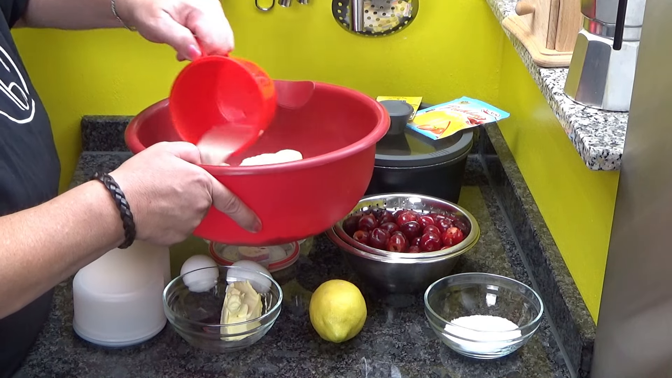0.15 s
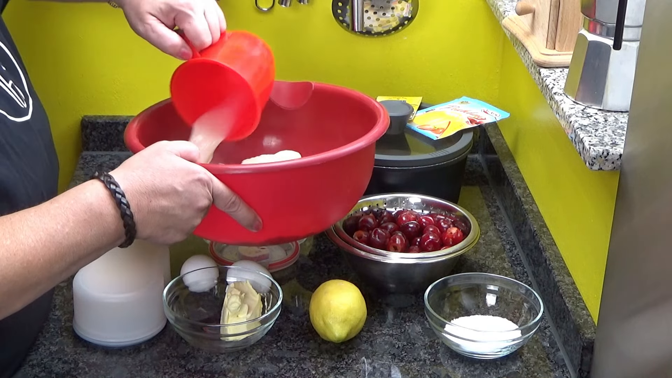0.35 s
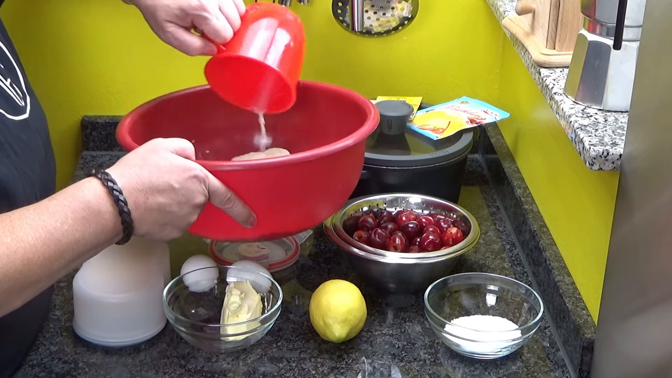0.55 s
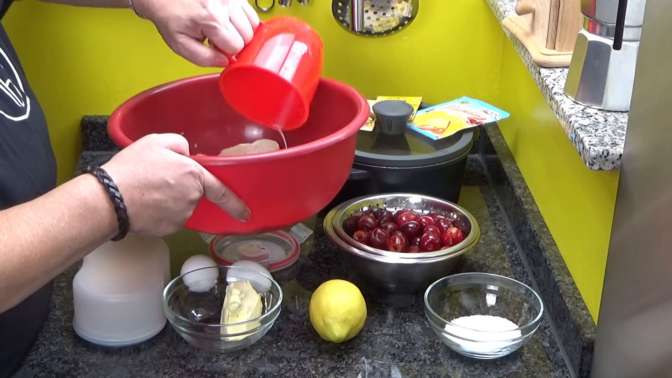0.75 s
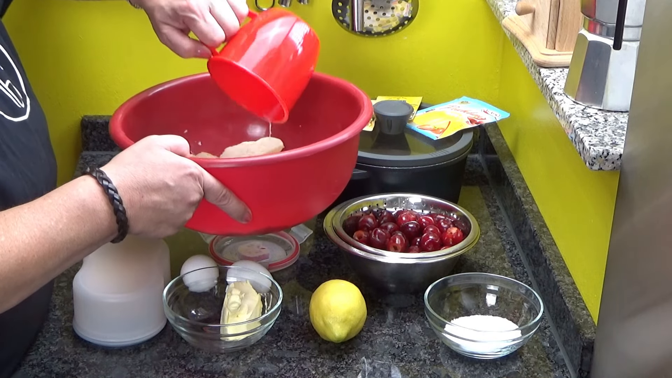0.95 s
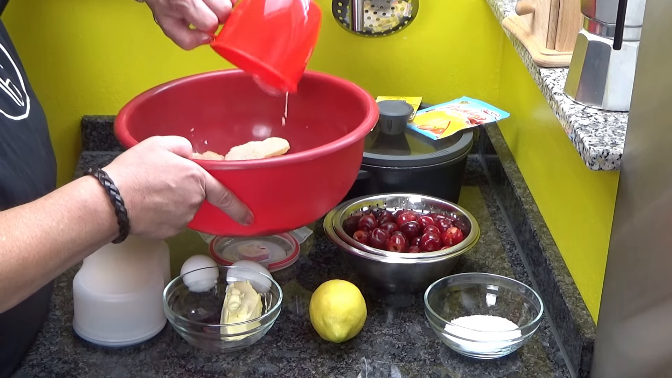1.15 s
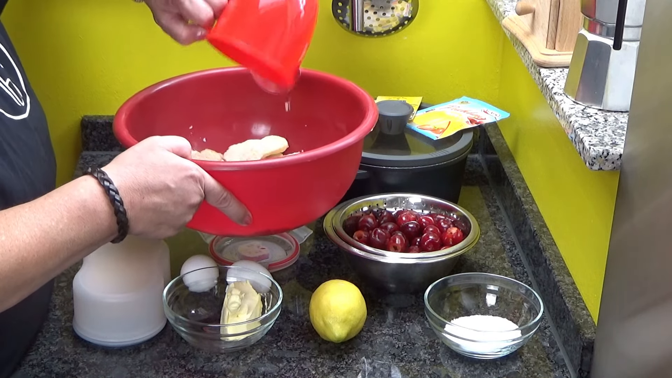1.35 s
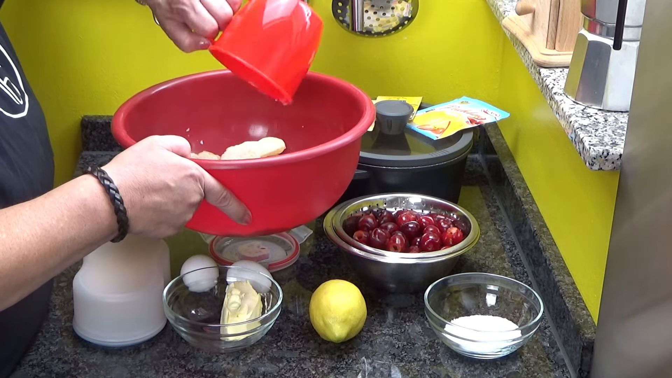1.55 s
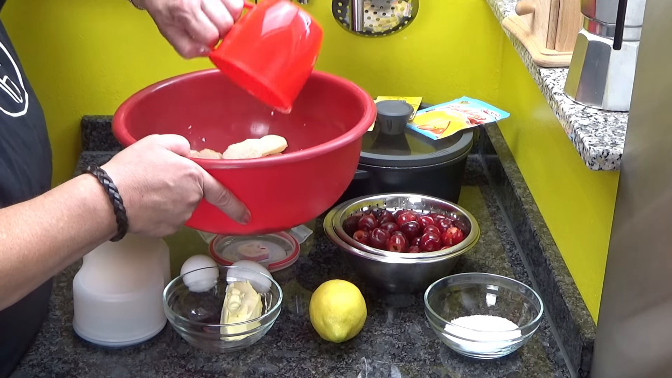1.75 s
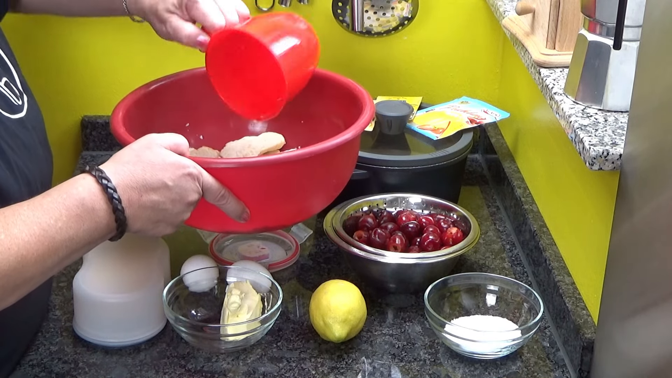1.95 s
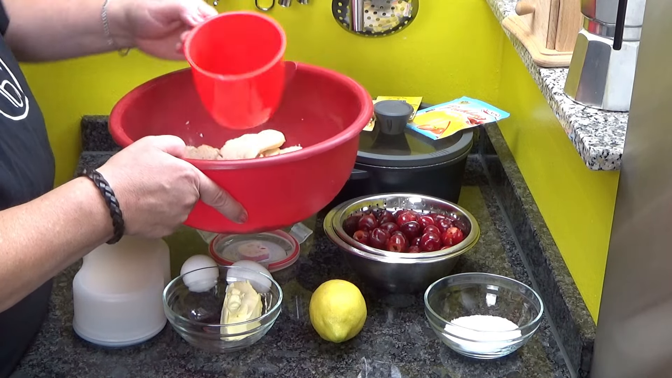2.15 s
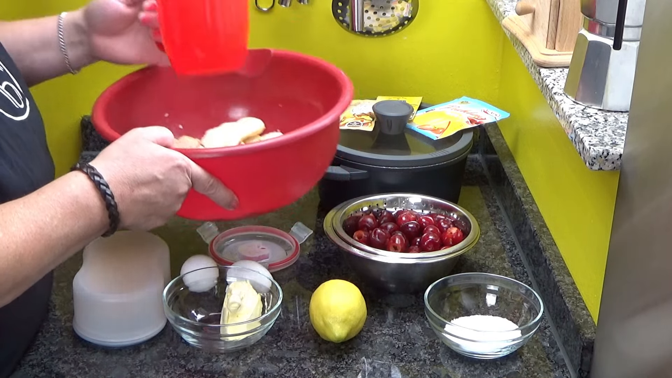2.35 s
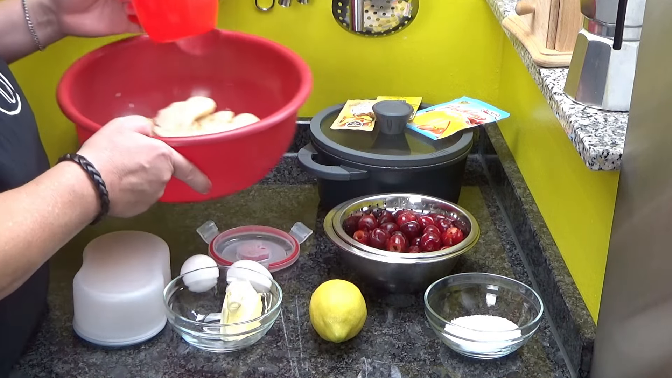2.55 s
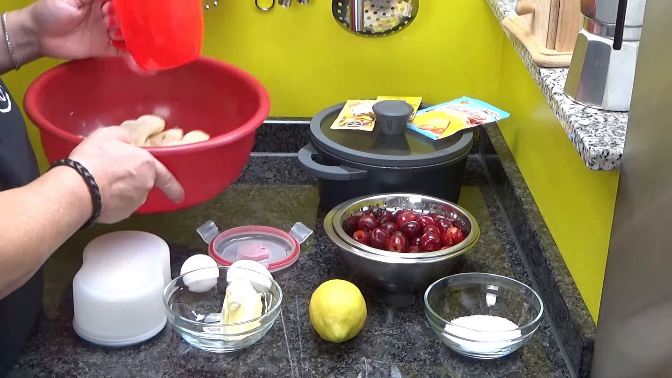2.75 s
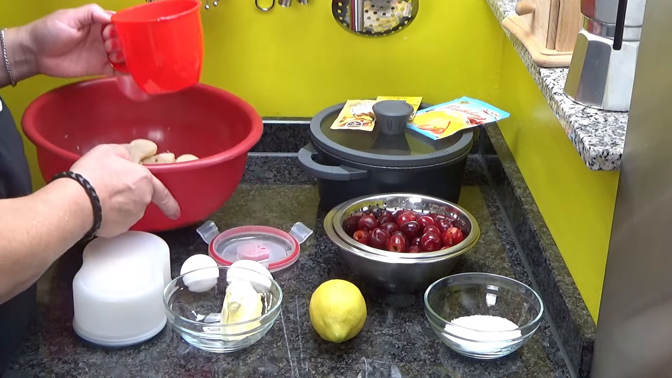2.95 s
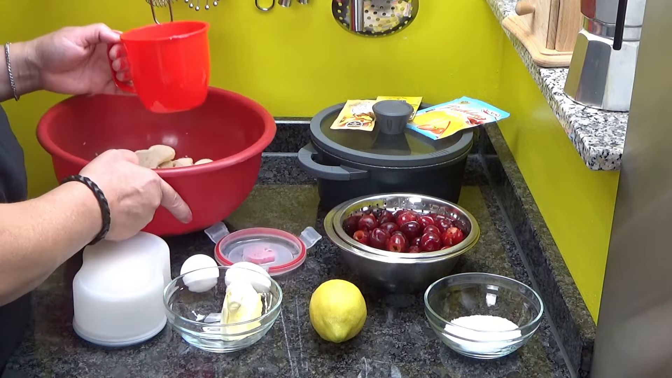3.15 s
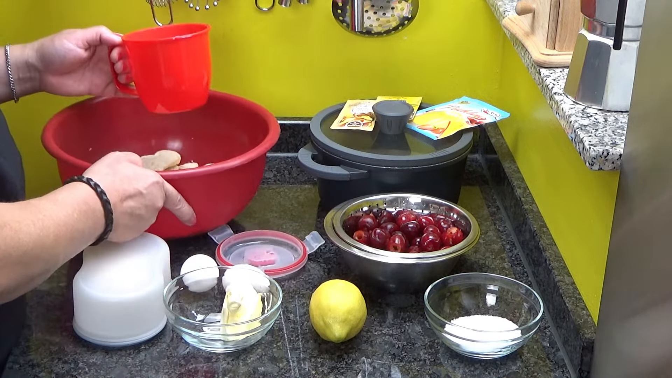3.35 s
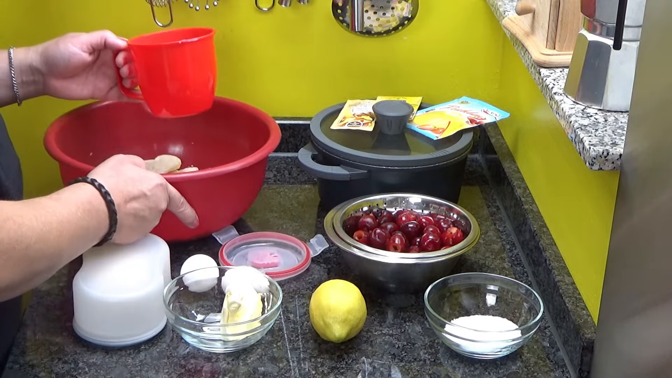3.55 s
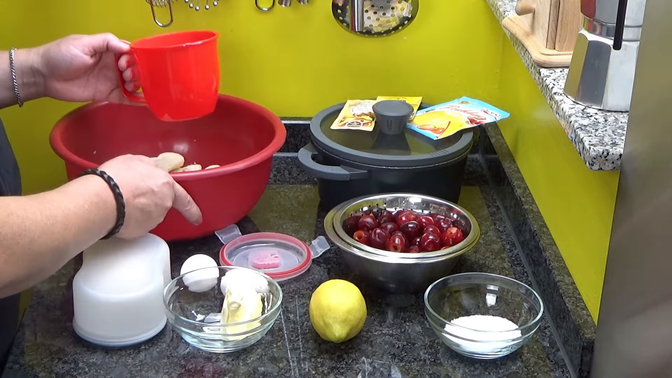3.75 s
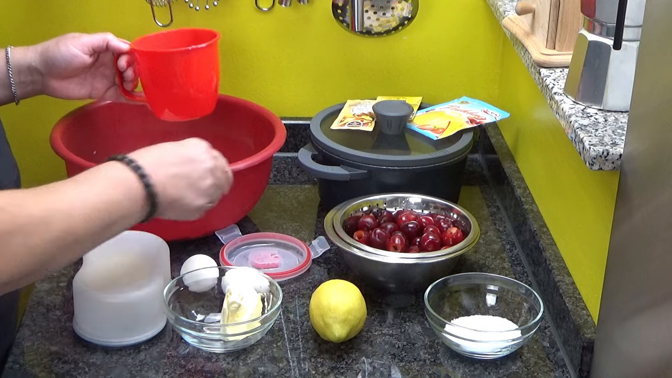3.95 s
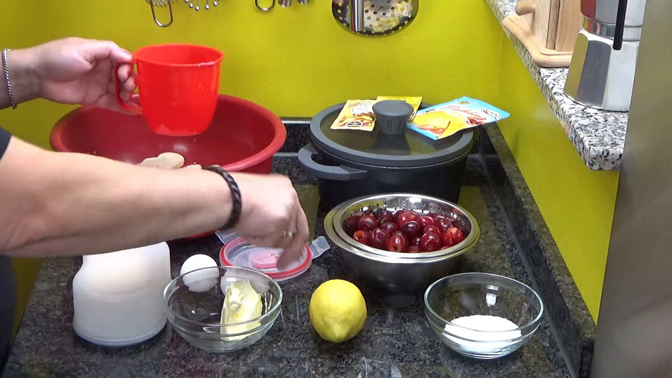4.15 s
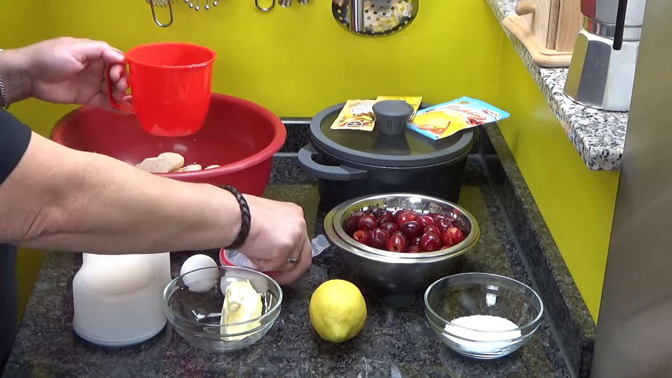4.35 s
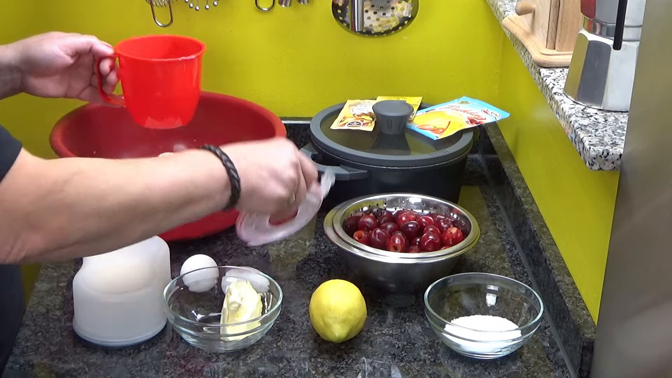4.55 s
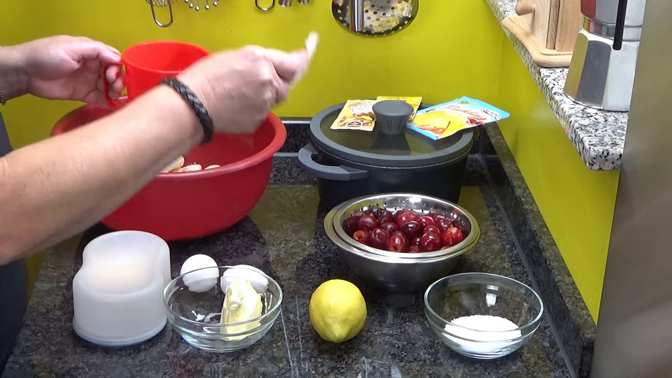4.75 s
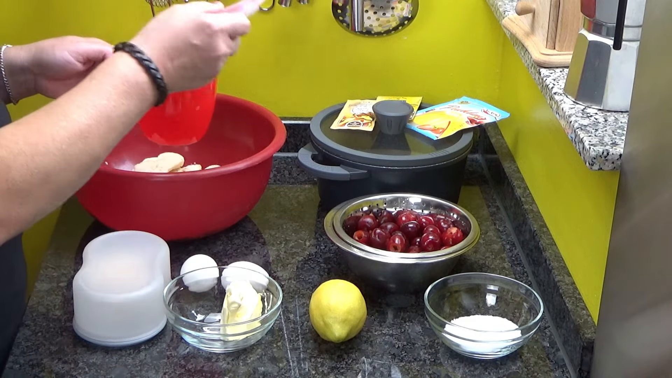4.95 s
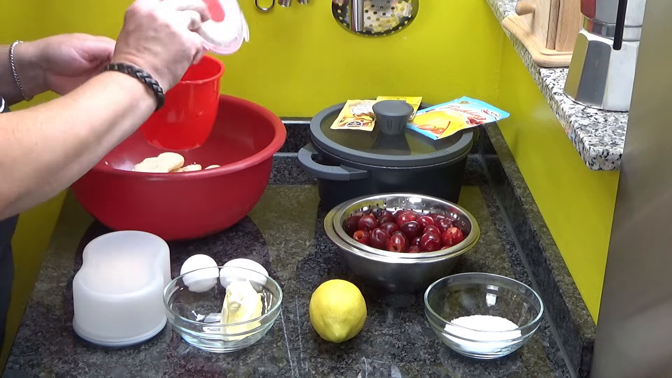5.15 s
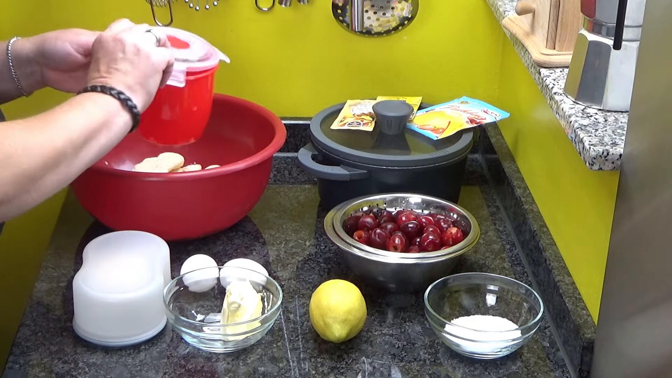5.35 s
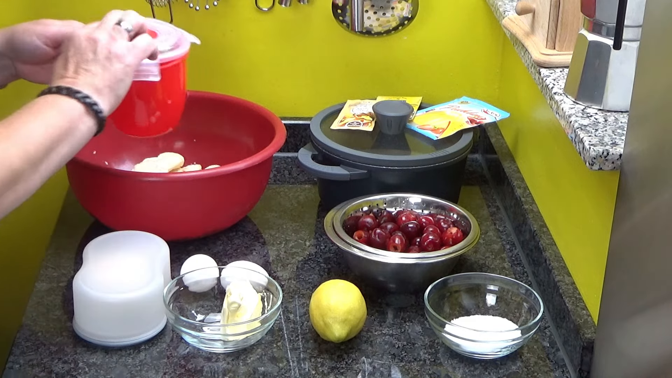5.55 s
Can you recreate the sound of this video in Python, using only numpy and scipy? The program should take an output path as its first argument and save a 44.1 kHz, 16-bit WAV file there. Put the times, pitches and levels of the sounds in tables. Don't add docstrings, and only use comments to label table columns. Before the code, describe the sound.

Liquid briefly fizzes and plips into a plastic bowl, then only hiss and faint regular ticking remain. Around three seconds the bowl touches the worktop, knocks loudly with a hollow ring, scrapes and taps; a faint camera whine begins. Soft hand touches follow, then a bright plastic snap and a quick double clack of a lid on a jug, with short tiled-room echo.

```python
import sys
import numpy as np
from scipy import signal
from scipy.fft import rfft, irfft, next_fast_len
from scipy.io import wavfile
from scipy.ndimage import uniform_filter1d

SR = 44100
rng = np.random.default_rng(int(sys.argv[2]) if len(sys.argv) > 2 else 0)


def field_ratio(decibels):
    return 10 ** (np.asarray(decibels, dtype=float) / 20)


def wav_out(sig):
    wavfile.write(sys.argv[1], SR, np.round(np.clip(np.atleast_2d(sig).T, -1, 1) * 32767).astype(np.int16))


N = 247489


def unit(x):
    return x / np.sqrt(np.mean(x ** 2) + 1e-20)


def along(points, hz):
    f, v = np.transpose(points)
    return np.interp(np.log(hz + 1), np.log(f + 1), v)


def colour(x, points, tilt_db=0):
    m = next_fast_len(x.shape[-1] + 4096) // 2 * 2
    hz = np.fft.rfftfreq(m, 1 / SR)
    gain_db = along(points, hz) + tilt_db * np.log2((hz + 50) / 1000)
    cepstrum = irfft(np.log(field_ratio(gain_db) + 1e-6), m)
    cepstrum[..., 1:m // 2] *= 2
    cepstrum[m // 2 + 1:] = 0
    return irfft(rfft(x, m) * np.exp(rfft(cepstrum)), m)[..., :x.shape[-1]]


def add(track, s, x):
    part = track[..., round(s * SR):round(s * SR) + x.shape[-1]]
    part += x[..., :part.shape[-1]]


# frequency in Hz, level in dB per Hz.
HISS_COLOUR = [(20, -7), (35, -1), (55, 1.5), (130, 2.5), (250, 1), (400, -1.6), (700, -2.6), (1200, -5.1),
               (2000, -8.3), (3200, -9.5), (5000, -12.2), (8000, -14.1), (12000, -17.4), (15900, -19.5)]
# frequency in Hz, level in dB per Hz.
HISS_SIDE_COLOUR = [(12, -45), (20, -31), (398, -3), (484, -6), (572, -3), (1150, -4.5), (1850, -7),
                    (7690, -21), (15900, -40)]
# frequency in Hz, width in Hz, level in dB.
HUM_RESONANCES = [(115, 19, -3.5), (191, 4.6, 1.5)]


def hiss_and_hum():
    hz = np.fft.rfftfreq(N, 1 / SR)
    resonance = sum(field_ratio(db) * hz * width / np.abs(centre * centre - hz * hz + 1j * hz * width)
                    for centre, width, db in HUM_RESONANCES)
    hum = unit(irfft(rfft(rng.standard_normal(N)) * resonance, N))
    hiss = unit(colour(rng.standard_normal(N), HISS_COLOUR))
    side = unit(colour(rng.standard_normal(N), HISS_SIDE_COLOUR))
    return np.array([field_ratio(-57.6) * hiss + field_ratio(-65.5) * hum, field_ratio(-65.5) * side])


def lens_motor():
    frame_s, hunt_s, spin_up_s = 0.04, 3.0, 0.05
    idle_click_db, hunt_click_db = -65, -72
    whine_db, ease_db, ease_s = -56.5, 1, 0.5
    since = np.arange(N) / SR - hunt_s
    hunting = 1 / (1 + np.exp(-since / spin_up_s))
    click_gain = field_ratio(idle_click_db + (hunt_click_db - idle_click_db) * hunting)
    whine_gain = hunting * field_ratio(whine_db + ease_db * np.exp(-abs(since) / ease_s))
    steps = np.zeros(N)
    steps[(np.arange(0.0195, N / SR, frame_s) * SR).astype(int)] = 1
    steps *= field_ratio(1.5 * rng.standard_normal(N))
    t = np.arange(600) / SR
    click = (np.sin(2 * np.pi * 2520 * t) + np.sin(2 * np.pi * 3520 * t)) * field_ratio(-60 * t / 0.03)
    whine = np.sin(2 * np.pi * 2730 * t) * np.exp(-((t - 0.0065) / 0.0042) ** 2)
    mid = signal.fftconvolve(steps * click_gain, click) + signal.fftconvolve(steps * whine_gain, whine)
    return mid[:N] * [[1], [-0.08]]


def bubbles(starts, hz, cycles, gain, rise):
    t = np.arange(700) / SR
    age = t * (hz / cycles)[:, None]
    phase = 2 * np.pi * hz[:, None] * t * (1 + rise * np.minimum(age, 1))
    wave = np.sin(phase) * np.exp(-3 * age) * (1 - np.exp(-t / 0.00022))
    where = (starts * SR).astype(int)[:, None] + np.arange(len(t))
    return np.bincount(where.ravel(), (gain[:, None] * wave).ravel(), N + SR)[:N]


# time in seconds, flow in dB.
STREAM_FLOW = [
    (0.021, -71),
    (0.294, -65.5),
    (0.436, -64.5),
    (0.57, -66),
    (0.68, -77),
]
# frequency in Hz, level in dB per Hz.
SPRAY_COLOUR = [(350, -25), (600, -11.5), (1560, -5), (2100, -10.5), (3360, -9), (5250, -10.5), (6960, -10),
                (9490, -11.5), (15000, -36)]
# start in seconds, peak in dB, bubble pitch in Hz, level in dB of the fine bubbles beside it.
BIG_DROPS = [(0.1224, -53, 3920, -70), (0.2547, -58, 2660, -47), (0.2892, -43, 3960, -65),
             (0.3089, -37, 4650, -64), (0.321, -43, 4860, -49), (0.3527, -38.5, 5500, -37.5),
             (0.3674, -48, 5010, -38), (0.4325, -27, 5260, -51), (0.441, -32, 5870, -58),
             (0.4486, -32, 5900, -45), (0.4552, -37, 2110, -65), (0.4907, -46, 6140, -52),
             (0.4965, -37.5, 11000, -46), (0.496, -41, 3960, -60), (0.5571, -45.5, 4200, -64)]


def pour():
    bubbles_per_s = 250
    times, flows = np.transpose(STREAM_FLOW)
    flow_db = np.interp(np.arange(N) / SR, times, flows, left=-120, right=-120)
    starts = np.arange(times[0], times[-1], 1 / bubbles_per_s)
    delay, pitch, life, size = rng.random((4, len(starts)))
    fizz = bubbles(starts + 0.012 * delay, 1500 * 7 ** pitch, 3 + 6 * life,
                   field_ratio(-4 * np.log(size + 1e-3)), rise=0.13)
    spray = unit(colour(rng.standard_normal(N), SPRAY_COLOUR))
    stream = field_ratio(flow_db) * (field_ratio(-3.5) * spray + field_ratio(-1) * fizz)

    sizes = []
    for start, peak_db, bubble_hz, fine_db in BIG_DROPS:
        sizes.append((start, peak_db, bubble_hz, 12.2))
        sizes.append((start, fine_db, 9200, 13.4))
    s, db, hz, cycles = np.repeat(np.transpose(sizes), repeats=6, axis=1)
    spread = rng.standard_normal((len(s), 2))
    late = abs(spread[:, 0]) * (np.arange(len(s)) % 6 > 0)
    drops = bubbles(s + 0.0037 * late, hz * np.exp(0.083 * spread[:, 1]), cycles,
                    field_ratio(db - 2.0 - 3.0 * late), rise=0.029)
    impacts = np.bincount((s * SR).astype(int), field_ratio(db), N)
    puffs = signal.fftconvolve(impacts, field_ratio(-60 * np.arange(3000) / SR / 0.041))[:N]
    return stream + drops + field_ratio(-35.5) * puffs * spray


# frequency in Hz, time to fall 60 dB in seconds.
KITCHEN_DECAY = [(150, 0.31), (600, 0.39), (2000, 0.47), (6000, 0.34), (14000, 0.32)]
# frequency in Hz, side against mid in dB.
ECHO_WIDTH = [(100, -45), (500, -19.5), (1500, -9.5), (4000, -12.5), (9000, -13), (14000, -27)]


def in_room(x, wet_db, sent=None):
    hz, t, z = signal.stft(rng.standard_normal((2, SR // 2)), SR, nperseg=256)
    tail = signal.istft(z * field_ratio(-60 * t / along(KITCHEN_DECAY, hz)[:, None]), SR, nperseg=256)[1]
    build_up = np.clip(np.arange(tail.shape[1]) / SR / 0.0074, 0, 1)
    tail *= build_up / np.linalg.norm(tail[0])
    tail[1] = colour(tail[1], ECHO_WIDTH)
    source = x if sent is None else sent
    wet = field_ratio(wet_db) * signal.fftconvolve(source[None], tail, axes=1)[:, :len(x)]
    return wet + [x, -0.04 * x]


# start in seconds, peak in dB, centre in Hz, spread in octaves, length in seconds.
SOFT_TOUCHES = [(2.202, -56, 4000, 1.2, 0.053), (2.904, -49.5, 505, 1.7, 0.069),
                (3.823, -48, 4900, 0.84, 0.012), (4.009, -46.5, 2400, 0.72, 0.03),
                (4.369, -47.5, 600, 2.2, 0.07), (4.417, -48.5, 4030, 1.3, 0.024),
                (4.423, -39, 404, 0.83, 0.045), (4.424, -40.5, 1750, 1.16, 0.035),
                (4.939, -54.5, 3300, 1, 0.067), (4.947, -54, 835, 0.71, 0.055),
                (5.007, -54, 835, 0.7, 0.092), (5.272, -48.5, 4000, 1.04, 0.019),
                (5.273, -50, 1420, .3, 0.023), (5.525, -43.5, 3000, 0.9, 0.018)]


def touches():
    track, t = np.zeros((2, N)), np.arange(SR // 3) / SR
    octaves = np.arange(-4, 5)
    for s, db, hz, spread, length in SOFT_TOUCHES:
        hump = np.transpose([hz * 2.0 ** (octaves * spread / 2), -3 * octaves ** 2])
        swell = 1 - np.exp(-t / (0.24 * length))
        puff = colour(rng.standard_normal(len(t)) * field_ratio(-60 * t / length) * swell, hump)
        add(track, s, in_room(field_ratio(db) * puff / abs(puff).max(), wet_db=-4))
    return track


def knocks(contacts, crack_colour, modes, ring_db, wet_db):
    track, t = np.zeros((2, N)), np.arange(SR // 2) / SR
    hz, level_db, t60 = np.transpose(modes)[:, :, None]
    for s, db, tilt_db, more_ring_db, length in contacts:
        crackle = rng.standard_normal(len(t)) * field_ratio(-60 * t / length) * (1 - np.exp(-t / 0.00058))
        crack = colour(crackle, crack_colour, tilt_db)
        crack /= abs(crack).max()
        average = colour(1.0 * (t == 0), crack_colour, tilt_db)
        average *= np.linalg.norm(crack) / np.linalg.norm(average)
        strengths = level_db + rng.normal(0, 1.15, hz.shape) + tilt_db * np.log2(hz / 1000)
        pitch = hz * (1 + 0.015 * rng.standard_normal(hz.shape))
        partials = field_ratio(strengths - 60 * t / t60) * np.sin(2 * np.pi * pitch * t)
        ring = partials.sum(axis=0) * (1 - np.exp(-t / 0.0017))
        ring *= field_ratio(ring_db + more_ring_db) / abs(ring).max()
        add(track, s, field_ratio(db - 5.0) * in_room(crack + ring, wet_db, sent=average + ring))
    return track


# start in seconds, peak in dB, brightness in dB per octave, ring in dB,
# contact length in seconds.
BOWL_SET_DOWN = [
    (3.1045, -21, 0.5, 0, 0.045),
]
# frequency in Hz, level in dB per Hz.
FOOT_COLOUR = [(71, -40), (120, -16), (387, 8), (555, 5), (751, -5.5), (1400, 5), (1900, -6), (2080, 4),
               (2420, -14), (2820, -6), (4190, -12.5), (4700, -18), (11000, -33.5), (14300, -58),
               (22000, -120)]
# frequency in Hz, level in dB, time to fall 60 dB in seconds.
FOOT_RING = [(227, -6.5, 0.2), (384, -22, 0.039), (527, -11.5, 0.094), (1175, -9.5, 0.054),
             (1730, -8, 0.06)]


def bowl_set_down():
    return knocks(BOWL_SET_DOWN, FOOT_COLOUR, FOOT_RING, ring_db=-11.0, wet_db=-1.5)


# firmest moment in seconds, swell in seconds, fade in seconds,
# level in dB, brightness from 0 to 1.
DRAG_STROKES = [
    (3.536, 0.027, 0.018, -40, 0.7),
    (3.651, 0.059, 0.034, -37.5, 0.36),
    (3.8, 0.14, 0.41, -55, 0.33),
    (4.15, .3, 0.36, -65, 0.98),
    (4.95, 0.61, 0.66, -67, 0.66),
]
# frequency in Hz, level in dB per Hz.
DRAG_COLOUR = [(180, -35), (300, -4), (881, 7), (2130, 0), (2350, -1), (3090, -6.5), (3690, -7.5),
               (7130, -16), (14000, -36)]


def scrape():
    edge_loss_db = 22
    grain_db = 4.7 * uniform_filter1d(rng.standard_normal(N), size=60) * np.sqrt(60)
    grit = rng.standard_normal(N) * field_ratio(grain_db)
    dull = unit(colour(grit, DRAG_COLOUR, tilt_db=-6))
    bright = unit(colour(grit, DRAG_COLOUR, tilt_db=3.0))
    s, swell, fade, db, push = np.transpose(DRAG_STROKES)[:, :, None]
    since = np.arange(N) / SR - s
    pressure = field_ratio(db - edge_loss_db * (since / np.where(since < 0, swell, fade)) ** 2)
    return (pressure * (dull * (1 - push) + bright * push)).sum(axis=0)


# start in seconds, peak in dB, brightness in dB per octave, ring in dB,
# contact length in seconds.
BOWL_BUMPS = [
    (3.5468, -5.5, 1, -1, 0.029),
    (3.583, -24.5, -5.5, 2.5, 0.021),
    (3.65, -31, -1, -4, 0.027),
    (3.731, -27, -1.5, 1.5, 0.034),
    (3.785, -36.5, -6, 1.5, 0.012),
    (3.894, -27.5, 1.1, -0.5, 0.082),
    (3.94, -39, 2.5, -12, 0.04),
]
# frequency in Hz, level in dB per Hz.
WALL_COLOUR = [(47, -59), (80, -23), (247, -22), (592, 2.5), (765, -22), (888, -10.5), (1220, -7),
               (2040, -13.5), (2220, -18), (2870, -23.5), (3400, -27.5), (8860, -44), (13000, -70)]
# frequency in Hz, level in dB, time to fall 60 dB in seconds.
BOWL_RING = [(172, -12.5, 0.12), (251, -7.5, .08), (381, -3.5, 0.076), (471, -1, 0.038),
             (570.2, 2.5, 0.088), (926, -7, 0.05), (1470, -14, 0.0068), (1780, -11.5, 0.039)]


def bowl_bumps():
    return knocks(BOWL_BUMPS, WALL_COLOUR, BOWL_RING, ring_db=-3.5, wet_db=-5.0)


# start in seconds, peak in dB, brightness in dB per octave, ring in dB, contact
# length in seconds.
CLIP_SNAP = [
    (4.5586, -15, 0.24, -0.57, 0.067),
]
CLIP_COLOUR = [(290, -50), (500, -20), (687, -25), (1060, -16), (1300, -15), (1500, 0), (2280, -15.5),
               (2490, -7), (3320, -11.5), (3570, -11.5), (6540, -9), (11000, -17.5), (15800, -42)]
CLIP_RING = [(340, -15.5, 0.12), (1520, -12, 0.053), (6600, -3, 0.034)]


def clip_snap():
    return knocks(CLIP_SNAP, CLIP_COLOUR, CLIP_RING, ring_db=-16.5, wet_db=-4.5)


# start in seconds, peak in dB, brightness in dB per octave, ring in dB,
# contact length in seconds.
LID_LANDING = [
    (5.3323, -7.5, -0.088, -4.5, 0.023),
    (5.341, -11.5, -2.3, 3.5, 0.026),
    (5.376, -20.5, -2.2, -8.5, 0.013),
]
# frequency in Hz, level in dB per Hz.
RIM_COLOUR = [(59, -44), (100, -43), (254, -16), (618, -4), (925, -8), (1270, -21.5), (1600, -13),
              (1940, -17.5), (5480, -20), (6090, -25.5), (8190, -25.5), (13100, -39.5), (15800, -51)]
# frequency in Hz, level in dB, time to fall 60 dB in seconds.
JUG_RING = [(364.6, -4.5, 0.094), (565, 0, 0.08), (633.6, 2, 0.1), (1500, -17, 0.035), (1748, -13.5, .08),
            (2400, -14, 0.051)]


def lid_landing():
    return knocks(LID_LANDING, RIM_COLOUR, JUG_RING, ring_db=-4.0, wet_db=-2.5)


# start in seconds, peak in dB.
LID_ROCKS = [
    (5.356, -16.5),
    (5.406, -22.5),
    (5.436, -23),
    (5.495, -44),
    (5.585, -55),
]
# frequency in Hz, level in dB per Hz.
HOLLOW_COLOUR = [(120, -40), (330, -14), (590, 0), (700, -8), (1000, -28), (2400, -40), (6000, -60),
                 (16000, -90)]
# frequency in Hz, level in dB, time to fall 60 dB in seconds.
CAVITY_RING = [(364, -5, 0.055), (585.5, 1, 0.13), (646, -3, 0.047)]


def lid_settling():
    tilt_db, more_ring_db, length_s = -2.3, 4, 0.026
    rocks = [(s, db, tilt_db, more_ring_db, length_s) for s, db in LID_ROCKS]
    return knocks(rocks, HOLLOW_COLOUR, CAVITY_RING, ring_db=0.0, wet_db=-8.0)


# frequency in Hz,
# gain in dB.
AIRBORNE_COLOUR = [(20, -47), (45, -16), (90, 4), (150, -0.5), (20000, 10)]


def scene():
    bowl = bowl_set_down() + bowl_bumps()
    lid = clip_snap() + lid_landing() + lid_settling()
    near = bowl + lid + touches() + in_room(scrape() + pour(), wet_db=-3.5)
    mid, side = colour(near, AIRBORNE_COLOUR) + lens_motor() + hiss_and_hum()
    return np.array([mid + side, mid - side])


def band_limit(x):
    return signal.sosfilt(signal.butter(12, 16480, fs=SR, output="sos"), x)


def record(dry):
    limited = irfft(rfft(dry) * (np.fft.rfftfreq(N, 1 / SR) < 15950), N)
    return band_limit(limited)


dry = scene()
out = record(dry)
wav_out(out)
```